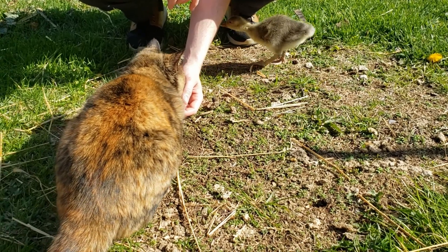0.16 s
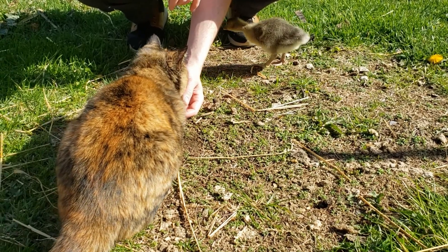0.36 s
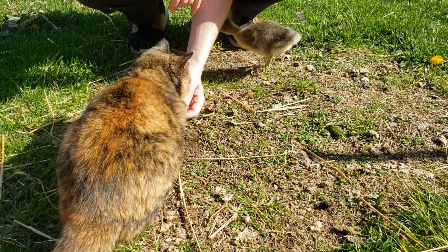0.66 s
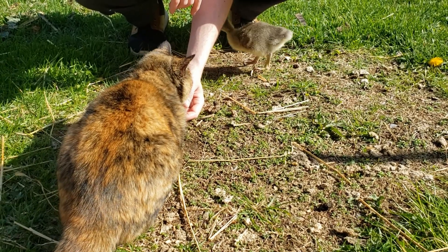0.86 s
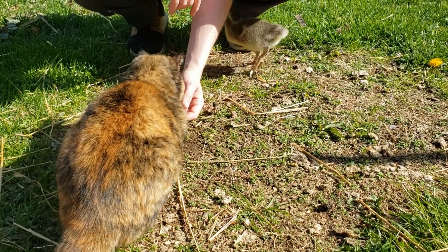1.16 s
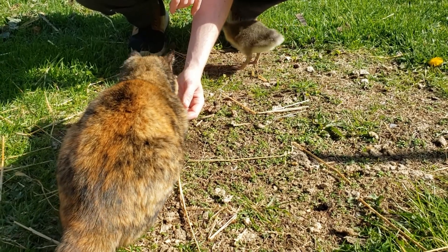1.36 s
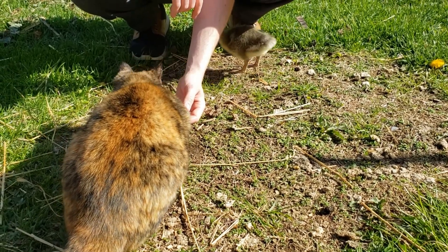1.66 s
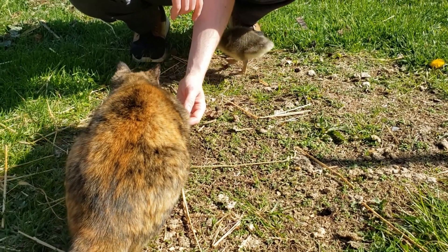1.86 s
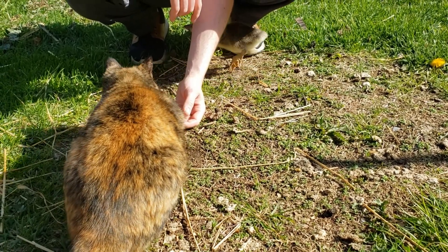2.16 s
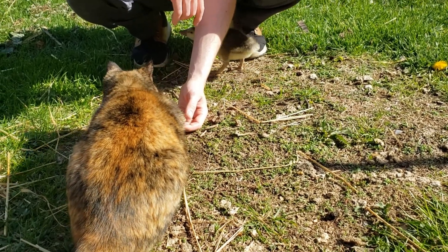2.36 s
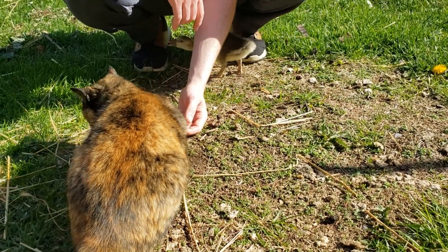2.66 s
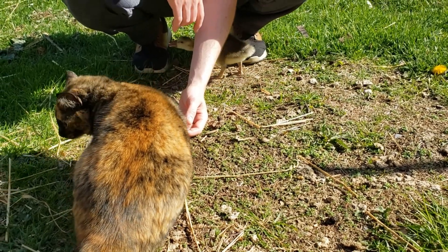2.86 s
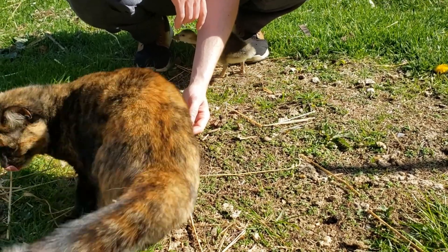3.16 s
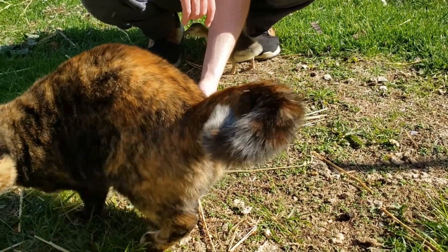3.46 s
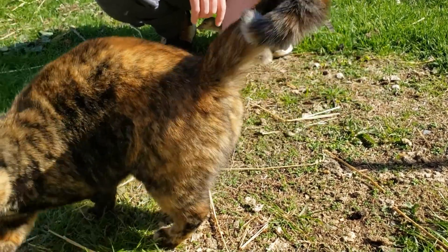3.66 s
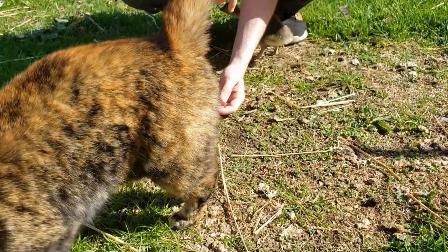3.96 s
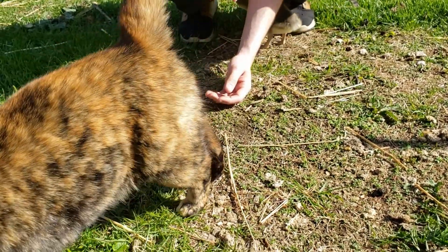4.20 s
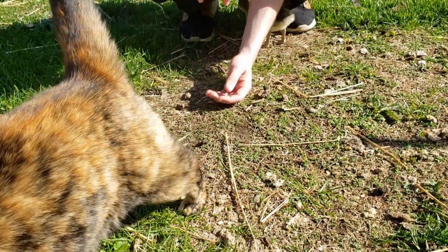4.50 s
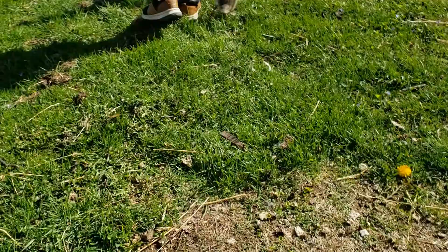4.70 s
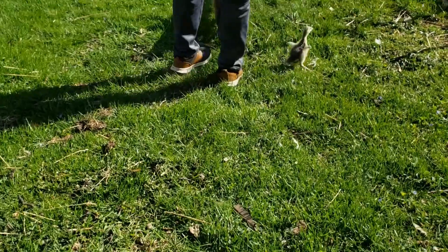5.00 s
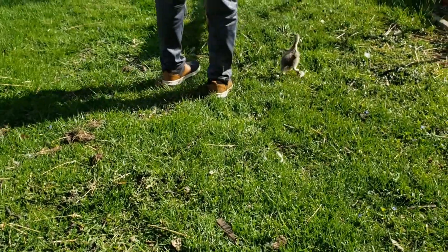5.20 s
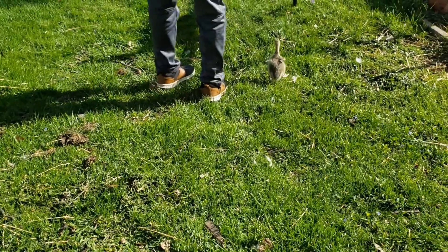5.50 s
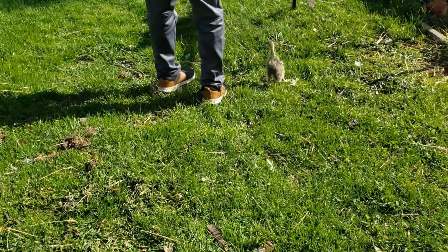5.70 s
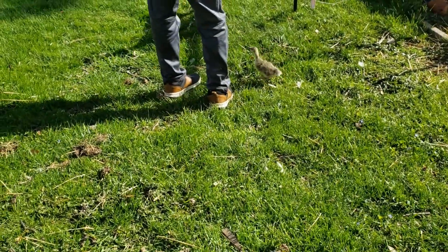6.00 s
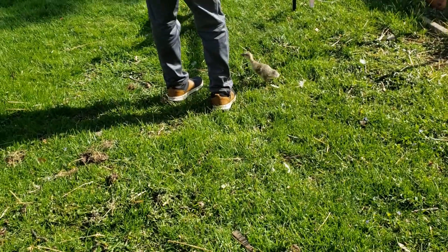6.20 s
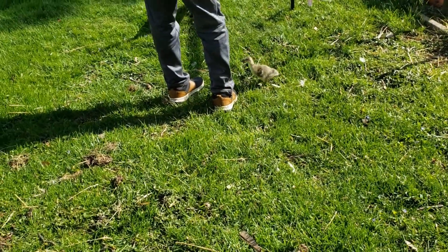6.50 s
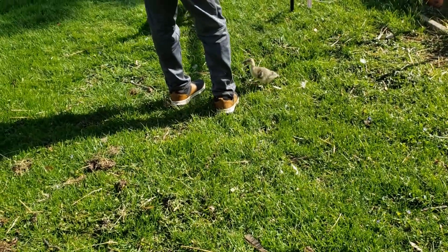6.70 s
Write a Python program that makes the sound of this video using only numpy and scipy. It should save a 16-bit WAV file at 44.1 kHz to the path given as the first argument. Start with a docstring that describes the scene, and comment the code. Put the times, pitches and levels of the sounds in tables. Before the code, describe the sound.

A gosling gives short, high peeps outdoors over low distant traffic, with two brief goose honks and sharp finger clicks and rubs on the microphone.

```python
"""On a lawn over distant traffic (banded noise) a gosling peeps: gliding near-sines with an octave.
A grown goose honks twice, pulse trains through throat resonances; far whistles are gliding sines.
A long thin hiss, banded noise, swells on the right with a blurred whistling line near 3.6 kHz in it.
Fingers tick and knock (decaying rings) and rub (friction noise) on a hand-held two-port recorder,
silent for a moment, then at a quieter spot."""
import sys
import numpy as np
from scipy import signal
from scipy.fft import rfft, irfft, next_fast_len
from scipy.io import wavfile
from scipy.ndimage import uniform_filter1d

SR = 44100
rng = np.random.default_rng(int(sys.argv[2]) if len(sys.argv) > 2 else 0)


def materialize(psi):
    """Save the field psi as 16-bit PCM at rate SR to the path in sys.argv[1].

    A 1-D psi becomes a single channel; in a 2-D psi each row is a channel.
    """
    bounded = np.clip(np.atleast_2d(psi).T, -1, 1)
    quanta = np.round(bounded * 32767).astype(np.int16)
    wavfile.write(sys.argv[1], SR, quanta)


def level_to_linear(level):
    """Convert decibel levels to linear amplitude factors, elementwise."""
    exponent = np.asarray(level, float) / 20
    return 10 ** exponent


N = 302085

# pause between the two spots: start_s, end_s
PAUSE_S = (4.714, 4.7455)


def rms_one(x):
    """Scale to unit rms."""
    return x / np.sqrt(np.mean(x ** 2) + 1e-20)


def in_time(rows):
    """Columns of (s, ..) rows at every sample."""
    s, *columns = np.transpose(rows)
    return [np.interp(np.arange(N) / SR, s, c) for c in columns]


def within(rows, edge_s):
    """One inside the span of the rows, zero outside, short ramps."""
    t = np.arange(N) / SR
    return np.clip(np.minimum(t - rows[0][0], rows[-1][0] - t) / edge_s, 0, 1)


def at_hz(points, hz):
    """Read a spectrum on a log axis."""
    return np.interp(np.log(hz), np.log(np.array(points)[:, 0]), np.array(points)[:, 1])


def drift(corner_hz):
    """Noise through two equal low-pass poles, run at SR / 40; rms 1."""
    pole = np.exp(-80 * np.pi * corner_hz / SR)
    white = rng.standard_normal(N // 40 + 2002)
    slow = signal.lfilter([1], [1, -2 * pole, pole * pole], white)[2000:]
    return np.interp(np.arange(N) / 40, np.arange(len(slow)), rms_one(slow))


def coloured(x, spectrum):
    """Shape noise to a spectrum; rms 1."""
    size = next_fast_len(N)
    hz = np.arange(size // 2 + 1) * SR / size + 1
    return rms_one(irfft(rfft(x, size) * level_to_linear(at_hz(spectrum, hz)), size)[..., :N])


def placed(x, pan_db, lag_s=0.):
    """Two ports: left-minus-right level difference; the left hears lag_s later."""
    t = np.arange(N)
    left = np.interp(t - lag_s * SR, t, x)
    return np.array([left * level_to_linear(pan_db / 2), x * level_to_linear(-pan_db / 2)])


def ring(x, hz, t60_s):
    """Two-pole resonator: a unit click starts a decaying sine of initial height 1."""
    r, w = level_to_linear(-60 / (t60_s * SR)), 2 * np.pi * hz / SR
    return signal.lfilter([0, np.sin(w)], [1, -2 * r * np.cos(w), r * r], x + 1e-18)


def whistle(rows, octave_db, mouth_hz, flutter_db, beak=((1, 0),)):
    """A gliding near-sine with an unsteady level; its octave sounds best near the mouth resonance."""
    hz, height = in_time([(s, f, level_to_linear(db)) for s, f, db in rows])   # linear height: round swells
    hz = uniform_filter1d(hz, size=180)
    phase = 2 * np.pi * np.cumsum(hz) / SR
    octave_gain = level_to_linear(octave_db - 37.0 * abs(np.log2(2 * hz / mouth_hz)))
    tone = level_to_linear(at_hz(beak, hz)) * np.sin(phase) + octave_gain * np.sin(2 * phase)
    return np.sqrt(2) * height * level_to_linear(flutter_db * drift(97)) * within(rows, 0.0042) * tone


def garden_echo(x, t60_s):
    """Scattered returns from walls and trees: a decaying noise tail, another one per port."""
    t = np.arange(round(t60_s * SR)) / SR
    tail = rng.standard_normal((2, len(t))) * level_to_linear(-60 * t / t60_s) * np.clip(t / 0.019, 0, 1)
    return signal.fftconvolve(x[None], tail / np.sqrt(np.sum(tail ** 2) / 2), axes=1)[:, :N]


def air():
    """Rumble and traffic wash: half-octave noise bands that flicker; each spot has its colour."""
    # gain on the spot colour: start_s, rumble_db, wash_db
    traffic = [(0, -37, -26.5), (.9, -35, -23), (1.4, -35.5, -22.5), (3.4, -33, -22.5), (4.3, -29.5, -19.5),
               (4.71, -30.5, -21), (4.75, -46, -23.5), (5.6, -38, -23.5), (6.85, -42.5, -30.5)]
    # spot colours: freq_hz, gain_db
    first_spot = [(30, -3), (64, 10), (134, 3.5), (273, -17.5), (404, -25.5), (569, -33), (822, -20),
                  (2300, -20.5), (3300, -42), (4800, -54), (9000, -52), (14000, -43)]
    second_spot = [(30, -15), (60, 8.5), (140, -1), (190, -18), (374, -42), (1010, -28.5), (3220, -39.5),
                   (8800, -49.5), (14000, -42.5)]
    # left-right correlation: freq_hz, likeness (-1 to 1)
    likeness = [(130, 0.94), (550, 0.51), (1300, -0.3), (3500, -0.12), (15000, 1)]
    steady_db = -35   # floor that does not follow the traffic
    near_wash_db, tyre_hz, tyre_db_per_db = -25.5, 4280, 1   # wash above near_wash_db brightens here

    rumble_db, wash_db = in_time(traffic)
    late = np.arange(N) / SR > PAUSE_S[0]
    white, edges, out = rng.standard_normal((2, 2, N)), 28 * 2 ** np.arange(0, 9.6, .5), 0
    for k, (low, high) in enumerate(zip(edges, np.minimum(edges[1:], .45 * SR))):
        band = signal.butter(3, [low, high], "band", fs=SR, output="sos")
        mid, side = signal.sosfilt(band, white[k % 2])   # neighbouring bands: unrelated noise
        hz = np.sqrt(low * high)
        alike = np.clip(at_hz(likeness, hz), -.95, .98)
        # the wash fills the middle
        wash_share = np.clip(np.log2(hz / 180), 0, 1) * np.clip(np.log2(9000 / hz), 0, 1)
        level_db = rumble_db if hz < 180 else wash_share * wash_db + (1 - wash_share) * steady_db
        tyre_share = max(1 - 2 * abs(np.log2(hz / tyre_hz)), 0)
        level_db = level_db + tyre_db_per_db * (wash_db - near_wash_db) * ~late * tyre_share
        colour_db = np.where(late, at_hz(second_spot, hz), at_hz(first_spot, hz))
        gain = level_to_linear(level_db + colour_db + 1.64 * drift(8.9))
        out = out + gain * (np.sqrt(1 + alike) * mid + np.sqrt(1 - alike) * side * [[1], [-1]])
    return out


def whistles():
    """Gliding sines with random modulation that blurs them: far whistles and a line within the hiss."""
    # far whistles, and a blurred whistling line near 3.6 kHz within the hiss (the row at 2.66 s):
    # start_s, length_s, first_hz, loudest_hz, last_hz, level_db, blur_hz
    calls = [(0.132, 0.12, 3050, 3110, 3200, -68.5, 89), (2.66, 0.34, 3420, 3560, 3770, -61.5, 160),
             (3.659, 0.036, 3150, 3260, 3200, -55.5, 450), (3.925, 0.075, 2760, 2760, 2620, -61.5, 43),
             (4.044, 0.051, 3170, 2850, 2930, -57.5, 15), (4.733, 0.098, 3640, 3715, 3800, -48.5, 8.4),
             (5.09, 0.17, 3960, 3760, 3520, -71, 34), (5.194, 0.12, 3700, 3700, 3900, -76, 70)]
    top_at, edge_db = .42, -10   # share of the length; level at both ends
    clear_hz = 35   # whistles blurred less than this stay mostly a steady tone

    far = 0
    for s, length_s, first_hz, top_hz, last_hz, db, blur_hz in calls:
        rows = [(s, first_hz, db + edge_db),
                (s + top_at * length_s, top_hz, db),
                (s + length_s, last_hz, db + edge_db)]
        tone = whistle(rows, -np.inf, SR, flutter_db=0.5)   # no octave
        smear = (clear_hz + blur_hz * drift(blur_hz)) / np.hypot(clear_hz, blur_hz)
        far = far + tone * smear
    return placed(far, 17.0) + level_to_linear(-1) * garden_echo(far, .25)


def hiss():
    """Bright noise from the right; its bands waver on their own and the top octave swells late."""
    # start_s, level_db, top_octave_db
    swell = [(1.2, -79, -7), (1.43, -60.5, -6), (1.7, -57.5, -6), (2.1, -48, -8), (2.45, -56.5, -5.5),
             (2.75, -48, -5), (2.9, -52.5, -5), (2.99, -80, 3)]
    # freq_hz, gain_db
    colour = [(2700, -11), (3600, -6.5), (5300, -10.5), (6000, -8), (6900, -3.5), (7600, 6.5), (8500, 0),
              (9150, -11.5), (9600, -5.5), (10300, -9), (11600, 1), (13600, -8.5), (16000, -13)]

    db, top_db = in_time(swell)
    # a part common to both ports plus one of each port's own
    white = rng.standard_normal((2, 1, N)) + 0.6 * rng.standard_normal((2, 2, N))
    white, edges, out = coloured(white, colour), np.geomspace(2500, 17000, 13), 0
    for k, (low, high) in enumerate(zip(edges, edges[1:])):
        sos = signal.butter(2, [low, high], "band", fs=SR, output="sos")
        band = signal.sosfilt(sos, white[k % 2])   # neighbouring bands: unrelated noise
        out = out + band * level_to_linear(2.3 * drift(1.94) + top_db * (low > 9500))
    return out * level_to_linear(db + 0.92 * drift(26)) * within(swell, 0.0043) * level_to_linear([[-3.5], [2.5]])


def rubs(port):
    """Skin sliding on a port: grainy friction, a dull body and a bright edge needing more pressure."""
    # peak_s, swell_s and fade_s (20 dB, dull part), dull_db, bright_db, port "L" or "R"
    strokes = [(.99, .008, .045, -53, -75, "R"), (1.152, .011, .03, -43, -73, "R"),
               (1.335, .015, .07, -47, -76, "L"), (1.388, .04, .022, -35.5, -70, "L"),
               (4.78, .1, .2, -45.5, -60, "L"), (4.79, .075, .09, -39, -32.5, "R"),
               (4.9, .1, .2, -51, -58, "R"), (4.95, .045, .024, -43.5, -53, "L"),
               (5.12, .4, .24, -80, -59, "R"), (5.52, .12, .042, -55, -72, "R"),
               (5.605, .025, .042, -47.5, -71, "R"), (5.932, .004, .07, -52, -70, "L"),
               (5.975, .055, .026, -44.5, -65, "R"), (6.052, .034, .04, -37, -80, "L"),
               (6.165, .13, .016, -41, -55, "L")]
    # dull part: freq_hz, gain_db
    colour = [(120, 8), (500, 11), (900, 0), (3000, -2.5), (6000, -5), (8500, -15)]
    firm_db = -38   # lighter strokes lose their top

    grain = rng.standard_normal((2, N)) * level_to_linear(3.2 * drift(300))
    dull = coloured(grain[0], colour)
    bright = coloured(grain[1], [(5000, -5.0), (8000, -12.5), (12000, 0.0), (16000, -3.5)])
    top = signal.sosfilt(signal.butter(2, 3600, "high", fs=SR, output="sos"), dull)
    dull = signal.sosfilt(signal.butter(2, 3600, "low", fs=SR, output="sos"), dull)
    out, t = 0, np.arange(N) / SR
    for s, swell_s, fade_s, dull_db, bright_db, side in strokes:
        if side == port:
            distance = np.minimum(np.maximum((s - t) / swell_s, (t - s) / fade_s), 3)
            stroke = level_to_linear(-20 * distance ** 2)
            stroke = stroke * ((t > PAUSE_S[0]) == (s > PAUSE_S[0]))   # heard at its own spot only
            body = dull - top * np.sqrt(stroke * level_to_linear(dull_db - firm_db))   # minus: crossover phase
            out = out + stroke * level_to_linear(dull_db) * body + stroke ** 2 * level_to_linear(bright_db) * bright
    return out


def handling():
    """Nail ticks ring a few cycles with a bright edge; finger knocks are soft pushes that ring low."""
    # on the case: start_s, level_db, ring_hz, left_minus_right_db
    ticks = [(1.0562, -29.5, 3150, 20), (1.333, -33.5, 2610, 20), (1.364, -32, 2800, 24),
             (1.3755, -24, 2820, 23), (1.3897, -16.5, 2100, 20.5), (1.401, -29, 3000, 11),
             (4.8266, -11.5, 2200, -11), (5.0346, -2, 3870, -10.5), (5.9247, -36.5, 2880, 40),
             (5.9964, -28, 1690, 21), (6.0268, -24.5, 2370, 19.5)]
    # start_s, level_db, ring_hz, t60_s, left_minus_right_db
    knocks = [(0.985, -28, 70, 0.11, -14), (1.147, -35.5, 97, 0.12, -15), (1.335, -24, 314, 0.0025, 30.5),
              (1.377, -19, 91, 0.1, 7.5), (1.3916, -6.5, 364, 0.0015, 21.5), (4.798, -37, 64.7, 0.23, -32),
              (4.8275, -13, 410, 0.011, 9), (4.931, -30.5, 71.5, 0.34, -16),
              (5.594, -16.5, 198, 0.0052, -13), (5.75, -30, 74, 0.068, -17.5),
              (5.9967, -14.5, 475, 0.0094, 22), (6.028, -21.5, 556, 0.0078, 29)]
    leak_db = -19   # rubs at the other port

    out, click = np.zeros((2, N)), np.arange(N // 20) == 0
    blows = []
    for s, db, hz, pan_db in ticks:
        tick = level_to_linear(-2.5) * ring(click, 4280, 0.0012) - ring(click, hz, 4.84 / hz)
        blows.append((s, db, pan_db, tick))
    for s, db, hz, t60_s, pan_db in knocks:
        knock = ring(click, hz, t60_s) + level_to_linear(-5.5) * ring(click, 1.8 * hz, 0.34 * t60_s)
        blows.append((s, db, pan_db, knock))
    for s, db, pan_db, sound in blows:
        out[:, round(s * SR):][:, :len(sound)] += sound * level_to_linear([[db + pan_db / 2], [db - pan_db / 2]])
    return out + rubs("L") * level_to_linear([[0], [leak_db]]) + rubs("R") * level_to_linear([[leak_db], [0]])


def goose():
    """Pulses in threes excite the throat; evening out lifts the pitch a twelfth; the chest hums along."""
    # start_s, length_s, top_group_rate_hz, level_db, evens_at (share of length; above 1: never)
    honks = [(3.069, 0.086, 169.9, -38, 1.1), (3.318, 0.114, 171.8, -37.5, 0.43)]
    # windpipe and beak, nearly shut and open: ring_hz, width_hz (each of two rings), gain_db
    throat_shut = [(620, 223, 1), (1250, 320, 9), (1820, 270, 1.5), (2340, 220, -1.5), (3390, 850, -4),
                   (4540, 770, -8)]
    throat_open = [(524, 220, -7), (1070, 280, 5.5), (1520, 350, 5.5), (2070, 310, -3), (3050, 910, -3.5),
                   (4470, 540, -7.5)]
    # close returns from ground and body that smear each pulse: lag_s
    scatter_s = (.0006, .0011, .0017)
    scatter_gain = .6
    weak_pulse, evening_s = 0.16, 0.023   # height of two pulses in three; time to even out
    top_at, sag_hz_per_s2 = .44, 3400   # arch of the rate; share of the length
    attack_s, release_s, edge_db = 0.023, 0.018, -7
    bright_ring_db = -33.5   # faint bright ring near 11.5 kHz added to the honk

    out, hum, t = 0, 0, np.arange(N) / SR
    for s, length_s, top_hz, level_db, evens_at in honks:
        end_s = s + length_s
        span = [(s, edge_db), (s + attack_s, 0), (end_s - release_s, 0), (end_s, edge_db)]
        hz = top_hz - sag_hz_per_s2 * np.minimum(abs(t - s - top_at * length_s), length_s) ** 2
        opening = np.clip((t - s - evens_at * length_s) / evening_s, 0, 1)   # beak opens, pulses even out
        even = weak_pulse + (1 - weak_pulse) * opening
        count = np.cumsum(3 * hz * (1 + .005 * drift(150))) / SR
        fired = np.diff(np.floor(count), prepend=0)
        pulses = fired * np.where(np.floor(count) % 3 == 0, 1, even) * level_to_linear(drift(250))
        pulses = pulses + .018 * rng.standard_normal(N)
        voice = 0
        for throat, share in ((throat_shut, 1 - opening), (throat_open, opening)):
            for k, (f, w, gain_db) in enumerate(throat):
                formant = ring(ring(pulses * share, f, 2.2 / w), f, 2.2 / w)
                voice = voice + (-1) ** k * level_to_linear(gain_db) * w * w * formant   # alternate signs: steep valleys
        neck = signal.butter(8, 5450, "low", fs=SR, output="sos")   # swallows the top
        voice = signal.sosfilt(neck, voice)
        voice = voice / np.sqrt(uniform_filter1d(voice ** 2, size=1500))
        voice = voice + level_to_linear(bright_ring_db) * rms_one(ring(pulses, 11500, 0.0015))
        group_phase = 2 * np.pi * count / 3
        chest = (1 - even) * (level_to_linear(-6) * np.sin(group_phase) + level_to_linear(-16) * np.sin(2 * group_phase))
        swell = level_to_linear(level_db + in_time(span)[0]) * within(span, 0.01)
        out, hum = out + voice * swell, hum + chest * swell
    for lag_s in scatter_s:   # all-pass loops
        loop = np.r_[1, np.zeros(round(lag_s * SR)), scatter_gain]
        out = signal.lfilter(loop[::-1], loop, out + 1e-18)
    out = out + hum
    return placed(out, 2.5, .00035) + level_to_linear(-11) * garden_echo(out, .3)


def gosling():
    """Near peeps: each a shared arch of pitch and level stretched to its own rise and top."""
    # top_s, rise_s, top_hz, level_db, start_extra_db, left_minus_right_db
    peeps = [(1.215, 0.021, 1983, -43, 6, 4), (1.379, 0.046, 2190, -48.5, 5, -4.5),
             (1.539, 0.038, 2730, -39.5, -25, 3), (1.703, 0.054, 2790, -39, -11, 1),
             (1.925, 0.031, 2155, -41, 9, -0.5), (2.132, 0.033, 2275, -43, 1, 6),
             (2.296, 0.048, 2896, -46, 10, 4), (2.527, 0.029, 2300, -50.5, 17.5, -2),
             (2.687, 0.055, 2725, -48, 4, 2), (2.976, 0.032, 2120, -46, 3, 8),
             (3.916, .028, 2090, -46, 5, 2), (4.091, 0.032, 2360, -49, -1, -1),
             (4.319, .026, 2200, -50.5, -7, -18), (4.483, 0.046, 2850, -52.5, -4, -21),
             (4.648, 0.043, 2764, -54.5, 0.5, -21), (4.819, 0.035, 2562, -44, -5, 16.5),
             (5.411, 0.038, 2986, -38.5, -1, 5), (5.614, 0.047, 3150, -35.5, -4.5, 3),
             (5.853, 0.043, 2876, -45, 13.5, 5.5), (6.155, 0.031, 2855, -48.5, 8, 2)]
    # arch: place (-1 start, 0 top, 1 end), share of the way from foot to top pitch, level_db
    feeding_shape = [(-1, 0.012, -3), (-.3, 0.803, -1.5), (0.19, 1.0, 1.5), (0.184, 0.987, 3),
                     (0.48, 0.49, -9.5), (0.9, 0.022, 7)]
    walking_shape = [(-1.2, -0.28, -38), (-.78, .22, -3), (-.3, .84, -4.5), (0.041, 0.97, 1),
                     (0.3, 0.77, -4.5), (.45, .45, -2), (0.47, 0.43, -11.5), (1, -0.31, -30.5)]
    # feeding, then walking: foot_hz, ceiling_hz (before the top), fall_s, octave_db, mouth_hz, left_lag_s
    manners = [(1820, 2170, 0.0192, -11, 4150, -.00009), (1705, 3300, 0.059, -23, 5860, .00007)]
    # octave strength over time: peep time_s, gain_db
    octave_over_time = [(1.9, -5), (2.5, -1), (4.3, -11), (4.7, -11), (4.8, -3)]
    # loudness by pitch: pitch_hz, gain_db
    beak_gain = [(1600, -8.5), (2200, -1.5), (2450, -4.5), (2700, -2.5)]

    near, dry_peeps = 0, 0
    for s, rise_s, top_hz, db, start_db, pan_db in peeps:
        walking = s > PAUSE_S[0]
        foot_hz, ceiling_hz, fall_s, octave_db, mouth_hz, lag_s = manners[int(walking)]
        rows = []
        for place, share, rel_db in (walking_shape if walking else feeding_shape):
            rising = place < 0
            hz = min(foot_hz + share * (top_hz - foot_hz), ceiling_hz if rising else top_hz)
            level_db = db + rel_db + start_db * max(-place, 0)
            rows.append((s + place * (rise_s if rising else fall_s), hz, level_db))
        octave_db = octave_db + np.interp(s, *np.transpose(octave_over_time))
        peep = whistle(rows, octave_db, mouth_hz, flutter_db=3.0, beak=beak_gain)
        near, dry_peeps = near + placed(peep, pan_db, lag_s), dry_peeps + peep
    return near + level_to_linear(-8) * garden_echo(dry_peeps, .19)


def scene():
    """Everything at the two ports."""
    return air() + whistles() + hiss() + handling() + goose() + gosling()


def band_limit(x):
    """A steep low-pass at the top of the band."""
    return signal.sosfilt(signal.butter(12, 15850, fs=SR, output="sos"), x)


def record(dry):
    """The ports cut the deep bass; a short silence parts the two spots."""
    t = np.arange(N) / SR
    on = np.clip(np.maximum(PAUSE_S[0] - t, t - PAUSE_S[1]) / .001, 0, 1)
    heard = signal.sosfilt(signal.butter(2, 45, "high", fs=SR, output="sos"), dry)
    return band_limit(heard * on)


dry = scene()
out = record(dry)
materialize(out)
```